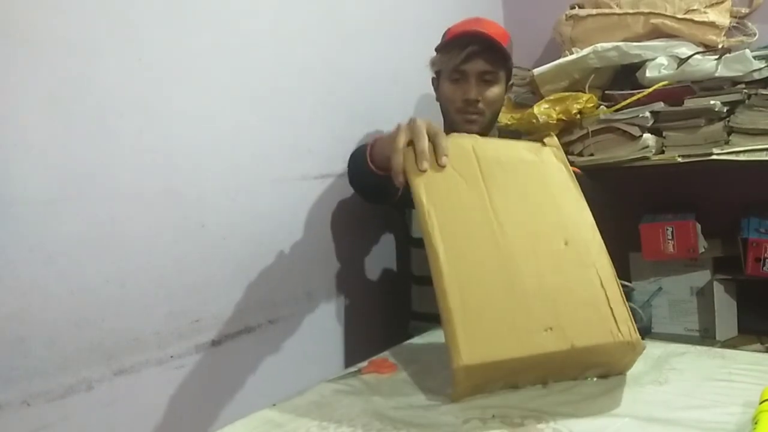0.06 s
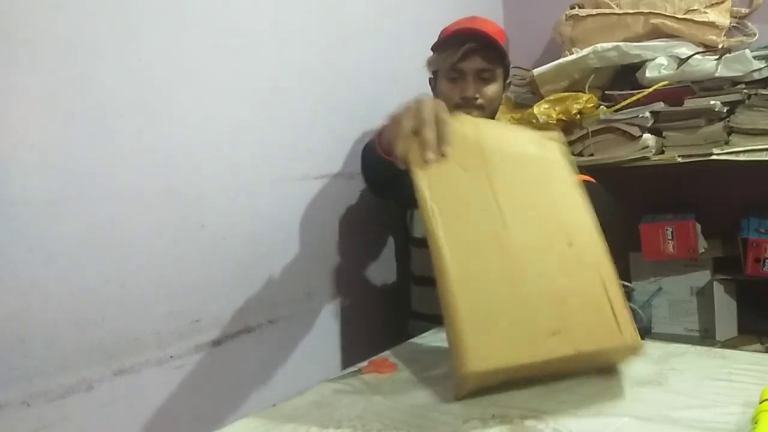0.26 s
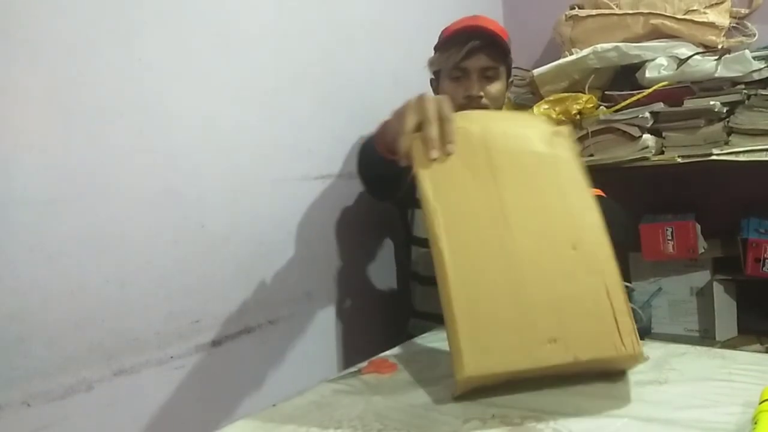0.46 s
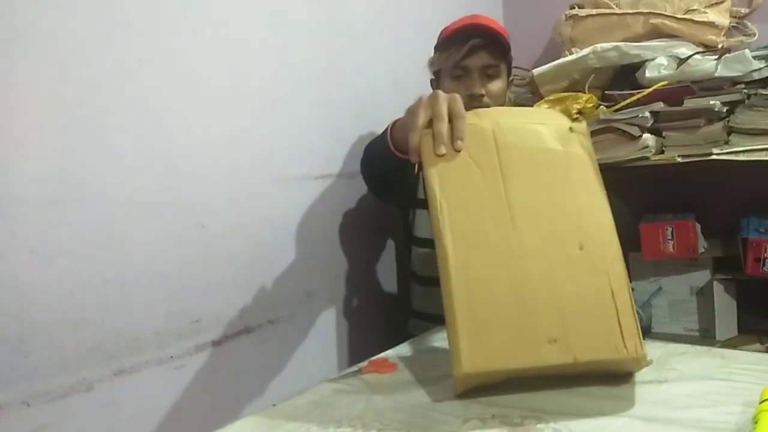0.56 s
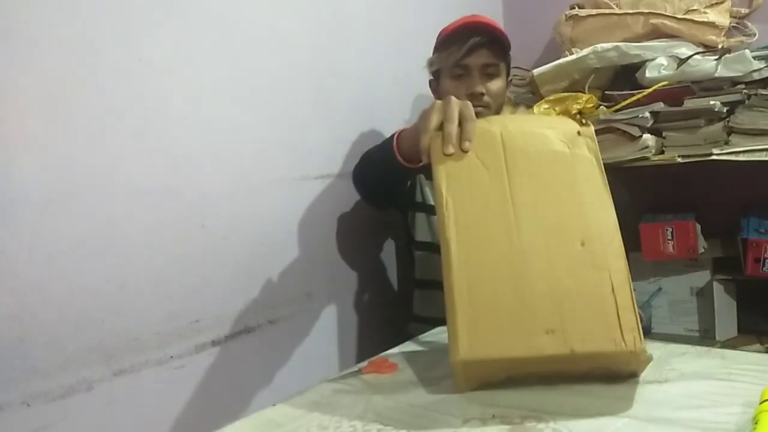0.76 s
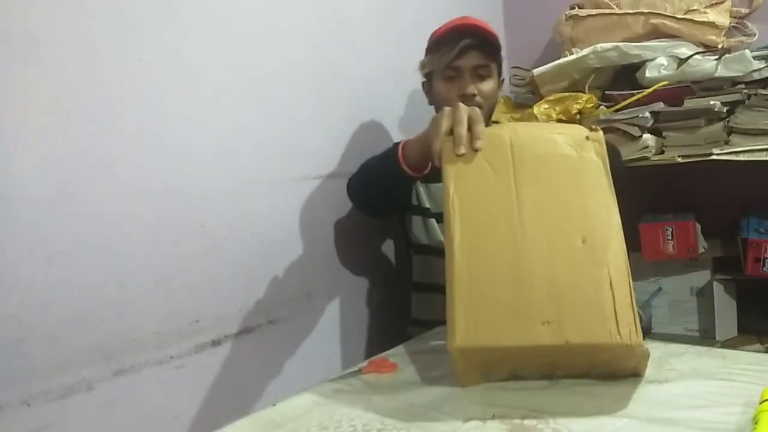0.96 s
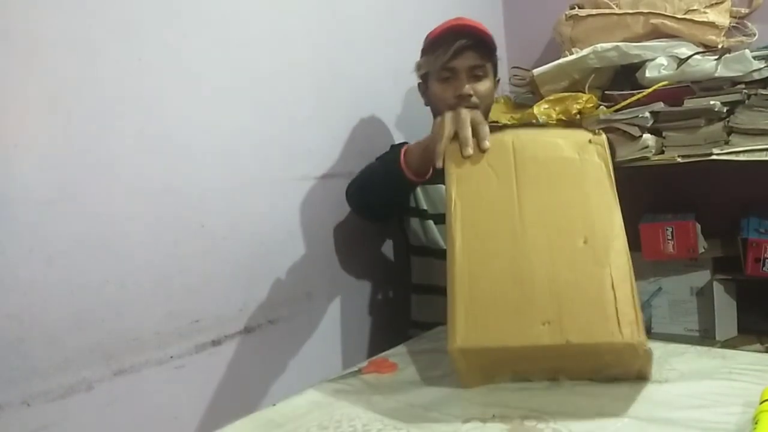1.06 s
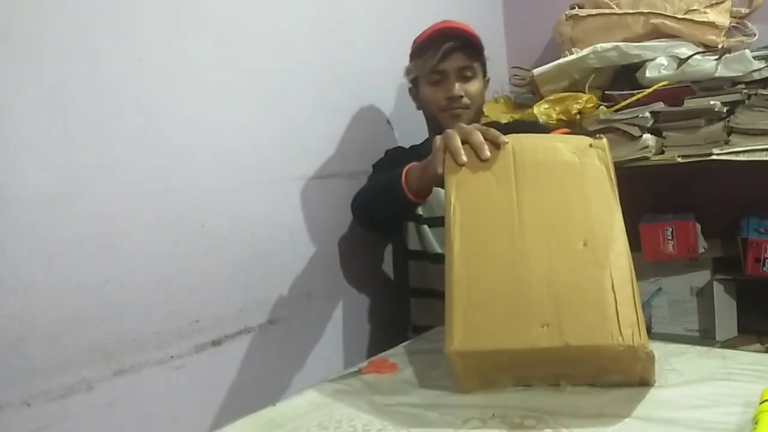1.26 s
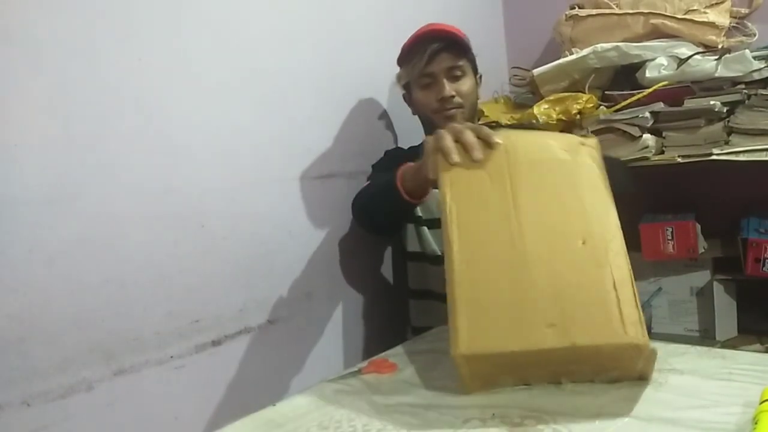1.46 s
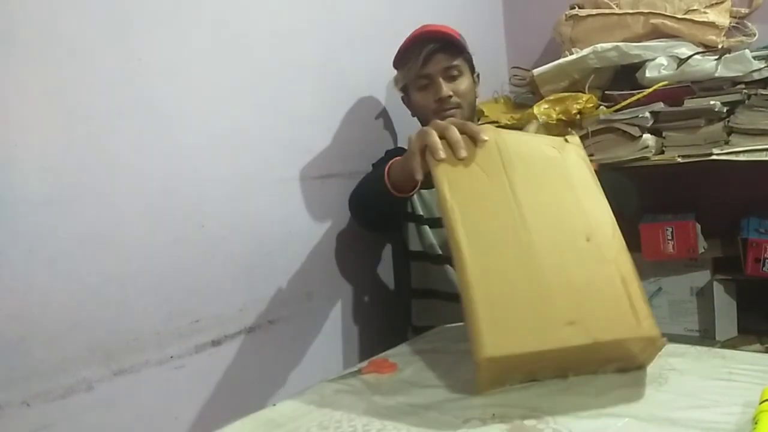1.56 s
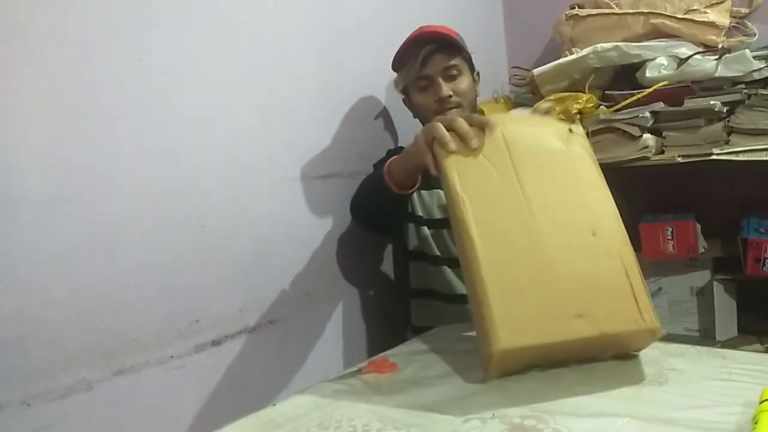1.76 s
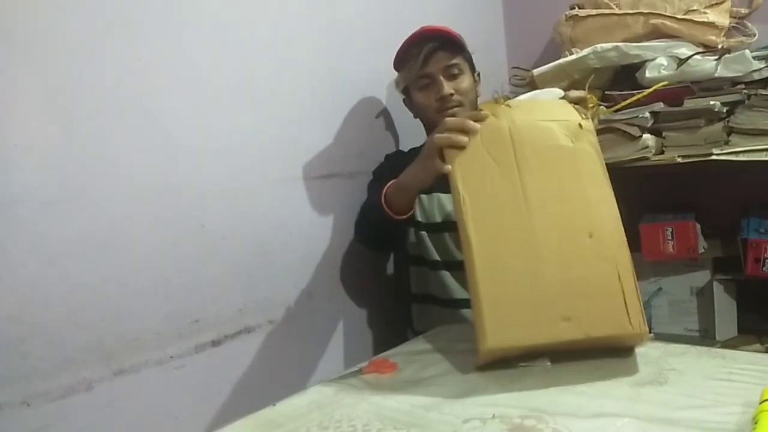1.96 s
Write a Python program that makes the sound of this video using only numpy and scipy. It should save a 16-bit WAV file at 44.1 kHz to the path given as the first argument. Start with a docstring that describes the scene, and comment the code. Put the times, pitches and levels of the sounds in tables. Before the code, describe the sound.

Hollow cardboard box scrapes and clatters on a tabletop, knocks down, then slides with a grainy hiss

```python
"""A large taped cardboard box is turned on a table in a small room, heard close by.
One edge judders over the table top in noisy catches, then the box rocks and drops flat with a hollow
knock: slip bursts and panel swings ring the box. The flat bottom then swivels with a long dry hiss of
grains, while the tape ticks and brushes under the fingers. Beneath lie a table hum and steady noise."""
import sys
import numpy as np
from scipy import signal
from scipy.fft import rfft, irfft
from scipy.io import wavfile
from scipy.ndimage import uniform_filter1d, minimum_filter1d

SR = 44100
rng = np.random.default_rng(int(sys.argv[2]) if len(sys.argv) > 2 else 0)


def log_audio(samples):
    """Write samples as a 16-bit WAV file to the path given in sys.argv[1]."""
    # one column per channel
    frames = np.atleast_2d(samples).T
    # limit to full scale, then quantise
    limited = np.clip(frames, -1, 1)
    pcm = np.round(limited * 32767).astype(np.int16)
    wavfile.write(sys.argv[1], SR, pcm)


N = 88200  # two seconds of samples

# Catches of the edge on the table: (time [s], relative level [dB], crack against crush [dB],
# burst time scale [s], nominal panel pitch [Hz])
EDGE_CATCHES = [(.016, -24, -9, 0.0039, 1110), (.054, -15.5, -10, 0.0012, 850),
                (.073, -28, -11, 0.0018, 990), (.208, -13.5, 0, 0.0061, 512), (.217, -13, 2, 0.0045, 744),
                (.234, -20, 14, 0.0054, 625), (.243, 3, -6.5, 0.0018, 893), (.2585, 2.5, -2.5, 0.009, 772),
                (.270, -3, -12, 0.0034, 950), (.281, -12, -7, 0.0012, 1310), (.288, 3.5, 6.5, 0.0011, 1010),
                (.296, -4, -5, 0.0039, 1240), (.307, -4, -4, 0.0046, 907), (.3235, 2.5, -4, 0.00257, 1010),
                (.344, -0.5, -4, 0.0011, 672), (.350, -5.5, -11, 0.0051, 1220),
                (.3835, -12.5, -2, 0.00155, 1520), (.653, -32.5, -25, 0.003, 810),
                (.974, -19, -11, 0.0087, 1130), (1.108, -19, 1, 0.011, 1520),
                (1.978, -24.5, 6, 0.0082, 1420)]
# Knocks of the bottom on the table: (time [s], relative level [dB], crack against crush [dB],
# burst time scale [s], nominal panel pitch [Hz])
BOTTOM_KNOCKS = [(.934, -24, -25, 0.0062, 396), (.945, -22, -13, 0.0065, 780),
                 (1.0365, -4, -9.5, 0.0036, 490), (1.0405, -7, -13, 0.0029, 780),
                 (1.0535, -5, -13, 0.0041, 563), (1.062, -9.5, -18, 0.0029, 1220),
                 (1.595, -22.5, -20, 0.011, 400)]
# Ring of the panels and the air in the box: (frequency [Hz], relative level [dB], 60 dB decay [s])
BOX_RING = [(241, -1, 0.19), (410.4, -12.5, 0.15), (521.6, -4.5, 0.066), (582, -15, 0.19),
            (755.5, 0.5, 0.11), (810, -10, 0.076), (895, -24, 0.071), (990, -22, 0.15), (1062, -9, 0.084),
            (1190, -10, 0.049), (1270, -20, 0.23), (2240, 5, 0.062), (2700, -7, 0.13)]
# Pressure of the dragged edge: (time [s], level [dB])
SCRAPE_LEVELS = [(0, -34), (.03, -31.5), (.065, -31.5), (.12, -43.5), (.19, -38.5), (.225, -28.5),
                 (.28, -9.5), (.34, -24), (.40, -34), (.47, -37), (.54, -47), (.62, -48.5), (.70, -54),
                 (.78, -52.5), (.92, -59.5), (.97, -36.5), (1.02, -43.5), (1.08, -30.5), (1.18, -48),
                 (1.25, -48)]
# Swivel of the flat bottom: (time [s], relative rub level [dB], relative rasp level [dB],
# relative hiss level [dB])
SWIVEL_LEVELS = [(1.17, -38.5, -44, -47.5), (1.22, -35.5, -29, -36.5), (1.246, -26.5, -23, -21.5),
                 (1.262, -31, -29, -37), (1.282, -33, -35.5, -34.5), (1.334, -27, -26.5, -30.5),
                 (1.372, -32, -31, -32.5), (1.414, -27.5, -27, -34), (1.478, -28, -24.5, -26.5),
                 (1.602, -26, -31, -29.5), (1.618, -30.5, -27.5, -29), (1.666, -29, -27.5, -35),
                 (1.676, -31, -32, -30.5), (1.858, -29, -30, -29), (1.942, -39, -43.5, -42),
                 (1.96, -41, -38, -36)]
# Ticks and creaks of the tape: (time [s], relative level [dB], pitch [Hz], width [Hz],
# burst time scale [s])
TAPE_TICKS = [(0.012, -23, 3280, 206, 0.0038), (.602, -31, 4470, 9000, 0.0018),
              (0.727, -40, 13200, 5940, .0008), (.7785, -43, 7000, 12100, 0.0011),
              (0.8594, -38, 6960, 14000, 0.00063), (0.978, -28.5, 3140, 400, 0.0024),
              (1.15, -15, 2100, 120, .003), (1.464, -13, 2215, 120, 0.0043),
              (1.982, -22.5, 3540, 500, 0.003)]
# Brief brushes of skin and tape: (time [s], level [dB], half length [s], pitch [Hz], width [Hz])
TAPE_BRUSHES = [(0.132, -53, .05, 8000, 12000), (0.232, -28, 0.019, 13000, 4000),
                (.561, -41, 0.0093, 10200, 3000), (0.605, -52, 0.043, 10500, 9000),
                (0.77, -55.5, .025, 9000, 8900), (0.957, -51, .015, 13000, 5000),
                (1.128, -50, 0.043, 9000, 10000), (1.253, -31, 0.005, 6200, 9000),
                (1.426, -30, 0.025, 4200, 1800), (1.657, -28, 0.011, 10200, 9000)]
# Rumble of the table top: (time [s], level [dB])
TABLE_RUMBLE = [(0, -64), (.24, -68), (.30, -50), (.36, -48), (.47, -55.5), (.62, -62), (.72, -77),
                (.90, -85), (.96, -57), (1.08, -67), (1.2, -70), (1.57, -71), (1.62, -47), (1.69, -57),
                (1.76, -60.5), (2.0, -67)]
# Decay of the room tail: (frequency [Hz], 60 dB decay [s])
ROOM_DECAY = [(100, 0.77), (500, 0.35), (1500, 0.43), (5000, 0.44), (15000, 0.49)]

# Tone of the crushed board under a catch: (frequency [Hz], relative gain [dB])
CATCH_TONE = [(30, -65), (120, -27), (250, -15.5), (400, -12.5), (550, -3.5), (800, -9.5), (1300, -0.5),
              (1900, -13), (3000, -13.5), (6000, -39), (16000, -79)]
# Tone of the crushed board under a knock: (frequency [Hz], relative gain [dB])
KNOCK_TONE = [(30, -26), (120, -18.5), (250, -8), (420, 3), (560, 1.5), (900, -3), (1250, 1.5), (1800, -14),
              (4000, -18), (16000, -44)]
# Tone of the bright crack: (frequency [Hz], relative gain [dB])
CRACK_TONE = [(100, -64), (700, -21), (1600, 4), (3000, -7.5), (5500, -8), (9000, -14.5), (13500, -14),
              (16000, -25)]
# Tone of the grinding edge: (frequency [Hz], relative gain [dB])
SCRAPE_TONE = [(40, -42), (130, -16.5), (240, -19), (380, -6.5), (550, 1), (800, 2), (1250, -2), (2000, -6),
               (3200, -11.5), (6000, -18), (10000, -26.5), (13500, -24), (15500, -28)]
# Tone of the rubbing bottom: (frequency [Hz], relative gain [dB])
RUB_TONE = [(40, -41), (200, -23.5), (320, -20), (500, -4.5), (800, -2), (1500, 0), (2300, -3.5),
            (3500, -12.5), (7000, -35), (16000, -56)]
# Tone of the rasping bottom edge: (frequency [Hz], relative gain [dB])
RASP_TONE = [(600, -38), (1800, -16), (2700, -3.5), (3800, -4), (5200, -6), (7500, -13.5), (15000, -47)]
# Tone of the tape hiss: (frequency [Hz], relative gain [dB])
HISS_TONE = [(1000, -23.5), (4000, -29), (6500, 1), (8000, -1), (10000, -4), (13500, -2), (15500, -8.5)]
# Tone of the background noise: (frequency [Hz], relative gain [dB])
FLOOR_TONE = [(25, -27), (50, -23), (72, -1), (100, 3), (200, -29), (400, -5), (750, 7.5), (1500, 3),
              (3500, 3), (8000, -9), (16000, -26)]

RING_DB = -48
FLEX_RISE_S, FLEX_JITTER = 0.0036, 0.015  # the jitter is a share of the panel pitch
RUB_DB, RASP_DB, HISS_DB = -1, -2.5, -2
EARLY_DB, EARLY_S = -10.5, 0.0027
ROOM_DB, ROOM_GAP_S = -9.5, 0.0035
RUMBLE_HZ, FLOOR_DB = 74.5, -52.5
CEILING, LIMIT_S, TOP_HZ = 0.77, 0.0033, 15550


def catches():
    """The juddering edge catches on the table and lets short bursts into the box."""
    return blows(EDGE_CATCHES, CATCH_TONE, gain_db=13.5, flex_db=-2, flex_s=0.0025, crack_stretch=1.47)


def knocks():
    """The bottom meets the table, and its panels swing longer for a hollow knock."""
    return blows(BOTTOM_KNOCKS, KNOCK_TONE, gain_db=9, flex_db=-1, flex_s=0.0041, crack_stretch=3.0)


def blows(table, tone, gain_db, flex_db, flex_s, crack_stretch):
    """Each contact flexes a panel, crushes the board briefly and gives a longer, bright crack."""
    crush, swing, crack = np.zeros((3, N))
    for start, db, crack_db, length, hz in table:
        swing += undb(db + flex_db) * flex(start, hz, flex_s)
        crush += undb(db) * burst(start, length)
        crack += undb(db + crack_db) * burst(start, length * crack_stretch)
    hollow = box(colour(crush, tone) + swing)
    return undb(gain_db) * (hollow + colour(crack, CRACK_TONE))


def flex(start, hz, decay):
    """The struck panel swings for a few cycles; energy 1."""
    age = np.maximum(np.arange(N) / SR - start, 0)
    pitch = hz * (1 + FLEX_JITTER * rng.standard_normal())
    envelope = (1 - np.exp(-age / FLEX_RISE_S)) * np.exp(-age / decay)
    swing = np.sin(2 * np.pi * pitch * age) * envelope
    return swing / np.linalg.norm(swing)


def burst(start, length):
    """A cluster of slips that builds up quickly and dies away; energy 1."""
    age = np.maximum(np.arange(N) / SR - start, 0) / length
    slips = grit(16000, 2.57) * age * np.exp(-1.5 * age)
    return slips / np.linalg.norm(slips)


def box(push):
    """The push itself plus the ring of the panels and the air inside."""
    t = np.arange(SR // 2) / SR
    ring = np.zeros(len(t))
    for hz, db, t60 in BOX_RING:
        ring += undb(db) * np.cos(2 * np.pi * hz * t) * np.exp(-np.log(1000) * t / t60)
    return push + undb(RING_DB) * convolve(push, ring)


def scrape():
    """The edge grinds over the table in coarse grains that ring the box."""
    grind = box(colour(grit(4000, 3.4), SCRAPE_TONE))
    return curve(*np.array(SCRAPE_LEVELS).T) * unit(grind)


def swivel():
    """The flat bottom slides: fine grains in the board, a rasp from its edge, hiss from the tape."""
    times, rub_db, rasp_db, hiss_db = np.array(SWIVEL_LEVELS).T
    rub = curve(times, rub_db + RUB_DB) * unit(box(colour(grit(5000, 4.06), RUB_TONE)))
    rasp = curve(times, rasp_db + RASP_DB) * colour(grit(6000, 1.8), RASP_TONE)
    hiss = curve(times, hiss_db + HISS_DB) * colour(grit(12000, 4.6), HISS_TONE)
    return rub + rasp + hiss


def tape(tick_db):
    """Slip bursts tick and creak in the wrapping; swells of fine grains brush under the hand."""
    t = np.arange(N) / SR
    ticks, brushes = np.zeros((2, N))
    for start, db, hz, width, length in TAPE_TICKS:
        ticks += undb(db + tick_db) * band(burst(start, length), hz, width)
    for at, db, half, hz, width in TAPE_BRUSHES:
        swell = np.exp(-((t - at) / half) ** 2 / 2)
        brushes += undb(db) * swell * band(grit(7200, 2.4), hz, width)
    return ticks + brushes


def table_top():
    """The table hums at its lowest resonance as the weight shifts."""
    return curve(*np.array(TABLE_RUMBLE).T) * unit(band(grit(810, 7.1), RUMBLE_HZ, 14))


def room(x):
    """The table scatters early echoes; bare walls return a dense tail whose low end lasts longest."""
    t = np.arange(N) / SR
    hz, t60 = np.array(ROOM_DECAY).T
    noise = rfft(rng.standard_normal(N))
    log_f = np.log(np.fft.rfftfreq(N, 1 / SR) + 1)
    tail = np.zeros(N)
    # overlapping bands of one noise, each with its own decay
    for share, decay in zip(np.eye(len(hz)), t60):
        part = irfft(noise * np.interp(log_f, np.log(hz), share), N)
        tail += part * np.exp(-np.log(1000) * t / decay)
    tail *= t > ROOM_GAP_S
    early = band(grit(2000, 0.79) * np.exp(-t / EARLY_S) * (t > .001), 4300, 11000)
    early_echoes = undb(EARLY_DB) * early / np.linalg.norm(early)
    late_echoes = undb(ROOM_DB) * tail / np.linalg.norm(tail)
    return x + convolve(x, early_echoes + late_echoes)


def background():
    """Steady coloured noise lies under everything."""
    return undb(FLOOR_DB) * colour(rng.standard_normal(N), FLOOR_TONE)


def grit(rate, spread_db):
    """Dense tiny slips of fibres, of uneven size, at a mean rate per second; rms 1."""
    size = undb(spread_db * np.minimum(rng.exponential(size=N), 4))
    slips = (rng.random(N) < rate / SR) * rng.choice([-1, 1], N)
    return unit(slips * size)


def curve(times, db):
    """Gain along a level curve, faded to silence outside it."""
    t = np.arange(N) / SR
    outside = np.maximum(times[0] - t, 0) + np.maximum(t - times[-1], 0)
    return undb(np.interp(t, times, db)) * np.exp(-outside / 0.055)


def band(x, hz, width):
    """One resonance that keeps the power of white noise."""
    f = np.geomspace(20, SR / 2, num=400)
    detuning = (f * f - hz * hz) / (f * width)
    return colour(x, np.c_[f, -10 * np.log10(1 + detuning ** 2)])


def colour(x, points, size=4096):
    """Causal filter through (frequency [Hz], gain [dB]) points that keeps the power of white noise."""
    hz, db = np.array(points, float).T
    log_f = np.log(np.fft.rfftfreq(size, 1 / SR) + 1)
    log_gain = np.interp(log_f, np.log(hz), np.log(undb(db)))
    # folding the cepstrum forward gives minimum phase
    cepstrum = irfft(log_gain)
    cepstrum[1:size // 2] *= 2
    cepstrum[size // 2 + 1:] = 0
    response = irfft(np.exp(rfft(cepstrum)))
    return convolve(x, response / np.linalg.norm(response))


def convolve(x, response):
    """Play a sound through a response."""
    return signal.fftconvolve(x, response)[:N]


def unit(x):
    """Scale to rms 1."""
    return x / np.sqrt(np.mean(x ** 2))


def undb(db):
    """Turn decibels into an amplitude factor."""
    return 10 ** (np.asarray(db) / 20)


def scene():
    """The handled box sounds in the room, over table hum and background; both channels are alike."""
    handling = catches() + knocks() + scrape() + swivel() + tape(tick_db=14)
    mono = room(handling) + table_top() + background()
    return np.array([mono, mono])


def record(dry):
    """A quick limiter holds the loudest peaks; the top is cut."""
    span = max(int(LIMIT_S * SR), 2)
    gain = np.minimum(1, CEILING / (np.abs(dry).max(axis=0) + 1e-9))
    gain = uniform_filter1d(minimum_filter1d(gain, span), span)
    top_cut = signal.ellip(12, .1, 90, TOP_HZ, fs=SR, output="sos")
    return signal.sosfilt(top_cut, dry * gain)


dry = scene()
out = record(dry)
log_audio(out)
```